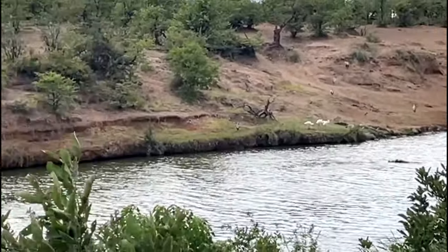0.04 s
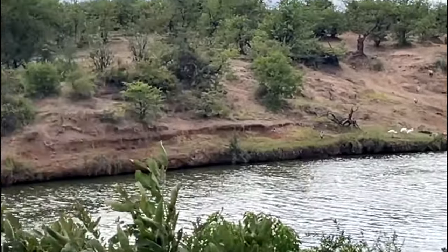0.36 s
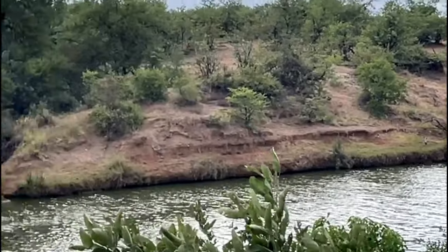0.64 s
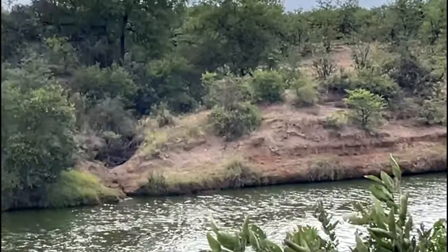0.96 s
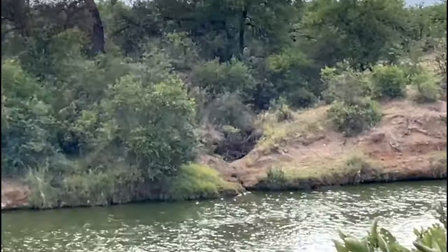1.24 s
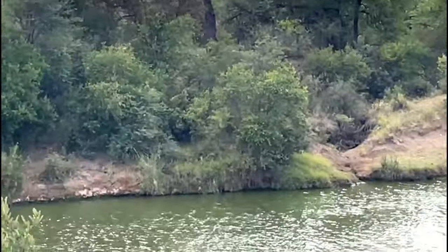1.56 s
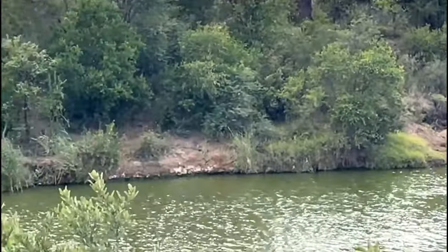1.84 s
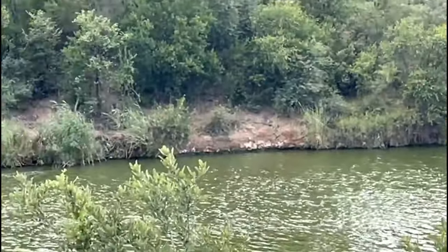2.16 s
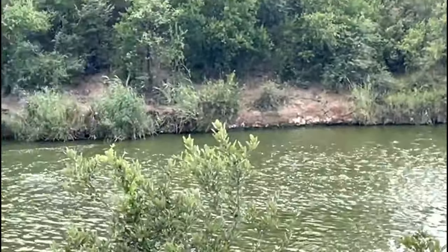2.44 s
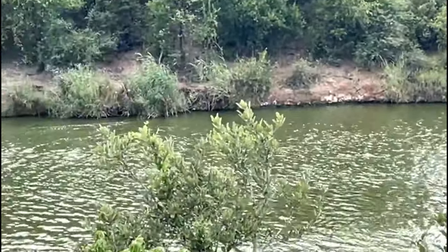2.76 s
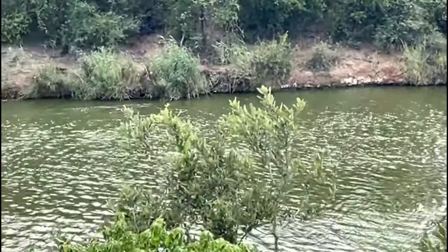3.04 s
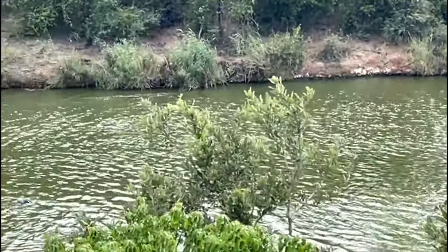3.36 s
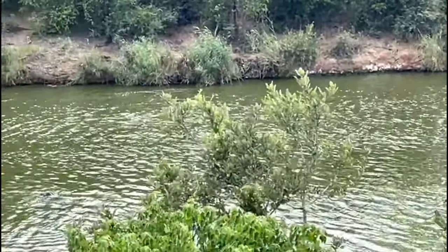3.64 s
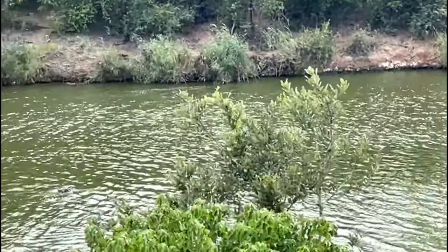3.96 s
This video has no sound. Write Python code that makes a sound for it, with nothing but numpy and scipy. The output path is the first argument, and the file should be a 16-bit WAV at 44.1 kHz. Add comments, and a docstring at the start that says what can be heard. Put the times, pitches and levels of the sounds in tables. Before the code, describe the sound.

Deep, gusty wind buffets a microphone outdoors by a river, swelling in the middle and thinning to single blows. A handling bump and small clicks come near the start, while faint birds whistle over the soft hiss of water.

```python
"""Wind blows across a hand-held microphone on a bank above a river.
From the start, large eddies make a deep rumble over the soft hiss of water. The first second brings
thin falling bird whistles, small dry clicks, a thud of the housing and a faint sniff-like hiss.
A near bird gives a buzzy double chirp. As the gust builds, eddies burst on the port, faster and sharper,
and leaves rustle at its height. More far whistles follow, and the wind thins out to single buffets."""
import sys
import numpy as np
from scipy import signal
from scipy.fft import rfft, irfft
from scipy.io import wavfile
from scipy.ndimage import uniform_filter1d, minimum_filter1d

SR = 44100
rng = np.random.default_rng(int(sys.argv[2]) if len(sys.argv) > 2 else 0)


def digitize_waveform(pressure):
    """Quantize a signal to 16-bit integers and store it at the path in sys.argv[1].

    Rows of a 2-D input are taken as channels; values are limited to [-1, 1].
    """
    field = np.atleast_2d(pressure).T
    bounded = np.clip(field, -1, 1)
    quanta = np.round(bounded * 32767).astype(np.int16)
    wavfile.write(sys.argv[1], SR, quanta)


N = 4 * SR

# slow pressure swell on the microphone: time_s, level_db
RUMBLE_LEVELS = [(0, -31), (.06, -27.5), (.2, -30.5), (.3, -26.5), (.37, -32), (.6, -25), (.75, -24),
                 (1.05, -22.5), (1.2, -20.5), (1.62, -21), (1.75, -16), (2.08, -19.5), (2.35, -15.5),
                 (2.8, -19), (2.93, -20), (3.05, -20), (3.35, -20), (3.47, -23), (3.6, -20), (3.71, -23.5),
                 (3.79, -19), (4, -23)]
# spectrum of the swell: frequency_hz, density_db
RUMBLE_SPECTRUM = [(20, -52), (31, -47), (42, -23), (58, -5), (95, -3), (160, -8), (250, -15.5), (400, -29),
                   (800, -52), (1600, -88)]
def rumble(evenness=.5, smoothing_s=0.019):
    """Turbulent pressure fluctuation: large, slow eddies merge into a fairly even roll."""
    pressure = noise(RUMBLE_SPECTRUM)
    power = uniform_filter1d(pressure ** 2, int(smoothing_s * SR))
    power = uniform_filter1d(power, int(smoothing_s * SR / 2))
    return envelope(RUMBLE_LEVELS) * rms_one(pressure / (power + 1e-6) ** (evenness / 2))


def eddy(t, hz, phase_turns, ringing=2.13):
    """Convection: a passing vortex pushes and pulls on the port; unit energy, centred on t = 0."""
    swing = np.exp(2j * np.pi * phase_turns) / (1 - 2j * np.pi * hz * t / ringing) ** (ringing + 1)
    pulse = swing.real * soft_window(t)
    return pulse / np.sqrt(np.sum(pulse ** 2))


# strength of the gust, as the level of its eddies: time_s, level_db
GUST_LEVELS = [(0, -41.5), (.24, -34.5), (.31, -27.5), (.37, -42), (.61, -29), (.73, -20.5), (.91, -20),
               (1.02, -26.5), (1.16, -19.5), (1.48, -19.5), (1.67, -23), (1.87, -18.5), (2.04, -24),
               (2.29, -19), (2.55, -19), (2.8, -23.5), (2.94, -29), (3.14, -26.5), (3.25, -26), (3.47, -33),
               (3.57, -31.5), (3.81, -35), (4, -26)]
def churn(eddies_per_s=520, spread_db=2.5, flutter_db=2.5, reference_hz=200.3, reference_db=-21):
    """Turbulence in a gust: stronger eddies pass faster, so louder pulses are also higher in pitch."""
    octaves_per_db, spread_octaves = 0.0853, 0.21
    count = 3000
    jitter, phases = rng.random((count, 2)).T
    size, pitch = rng.standard_normal((2, count))
    times = (np.arange(count) + jitter) / eddies_per_s
    gust, flutter = curve(GUST_LEVELS, times), drift(rate_hz=37.5)
    excess_db = np.log(10) / 20 * (spread_db ** 2 + flutter_db ** 2)   # power added by random levels
    stream_gain = np.sqrt(SR / eddies_per_s) / from_db(excess_db)
    out, t = np.zeros(N), np.arange(-400, 400) / SR
    for k in np.flatnonzero(times < (N - 1) / SR):
        db = gust[k] + flutter_db * min(flutter[int(times[k] * SR)], 1.5)
        db += spread_db * np.clip(size[k], -2, 2)
        octaves = octaves_per_db * (db - reference_db) + spread_octaves * np.clip(pitch[k], -2, 1.5)
        pulse = eddy(t, reference_hz * 2 ** octaves, phases[k]) * soft_window(t)
        add(out, times[k] + t[0], stream_gain * from_db(db) * pulse)
    return butter(out, 1170, "low", order=6)


# knots of eddies that hit the port: centre_s, level_db, length_s, pitch_hz
BUFFET_KNOTS = [(0.282, -16, 0.012, 135), (0.345, -24.5, 0.013, 197), (0.418, -19, 0.012, 100),
                (0.545, -22, 0.0122, 201), (0.71, -17.5, 0.019, 204), (0.862, -27, .012, 240),
                (0.88, -21.5, 0.0096, 280), (0.959, -14, 0.0083, 280), (1.153, -17.5, 0.0098, 280),
                (1.171, -15.5, 0.015, 251), (1.203, -19.5, 0.016, 240), (1.246, -21, 0.016, 279),
                (1.302, -23, 0.026, 234), (1.345, -16, .012, 167), (1.359, -19, 0.011, 290),
                (1.463, -15, .014, 277), (1.534, -9, 0.014, 209), (1.579, -15.5, 0.0089, 260),
                (1.717, -13.5, .018, 200), (1.768, -17, 0.016, 270), (1.791, -17, 0.0089, 400),
                (1.805, -15.5, 0.011, 310), (1.879, -16, 0.011, 330), (1.905, -13, 0.02, 231),
                (1.936, -15.5, 0.016, 190), (2.176, -7, 0.012, 280), (2.259, -19, 0.011, 280),
                (2.286, -12.5, 0.012, 280), (2.309, -10.5, 0.021, 244), (2.35, -14, .01, 220),
                (2.379, -22, 0.014, 280), (2.451, -13, 0.015, 250), (2.588, -12.5, 0.0094, 230),
                (2.605, -19.5, 0.011, 344), (2.511, -13, 0.00783, 217), (2.68, -14, 0.013, 234),
                (2.767, -14.5, 0.018, 235), (2.864, -17, 0.013, 257), (2.881, -25, 0.01265, 272),
                (3.036, -16, 0.015, 128), (3.092, -17, 0.013, 219), (3.117, -16, 0.01185, 272),
                (3.172, -13.5, 0.014, 178), (3.331, -15.5, 0.014, 219), (3.381, -17, 0.013, 195),
                (3.434, -12.5, 0.021, 136), (3.512, -12.5, 0.017, 249), (3.532, -15.5, 0.016, 215),
                (3.582, -20, 0.0099, 204), (3.65, -13.5, 0.016, 171), (3.723, -21.5, 0.0087, 186),
                (3.741, -19.5, 0.013, 197), (3.789, -12.5, 0.017, 109), (3.83, -15.5, 0.017, 121),
                (3.877, -16, 0.014, 240), (3.894, -25, 0.013, 267), (3.943, -18, .015, 135)]
def buffets(count=5, spread_share=0.397, spread_octaves=0.14, trim_db=-0.12):
    """Superposition: one strong eddy and weaker ones crowded around it sum to a single blow."""
    out, t = np.zeros(N), np.arange(-2000, 2000) / SR
    places = np.linspace(-1, 1, count)
    weights = from_db(-6 * np.abs(places))
    for centre_s, db, length_s, hz in BUFFET_KNOTS:
        phases, jitter, detune = rng.uniform(-1.068, 1, (3, count))
        delays_s = length_s * spread_share * (places + jitter / count)
        pitches_hz = hz * 2 ** (spread_octaves * detune)
        knot = sum(weights[k] * eddy(t - delays_s[k], pitches_hz[k], phases[k]) for k in range(count))
        knot *= np.sqrt(length_s * SR / np.sum(knot ** 2))
        add(out, centre_s + t[0], from_db(db + trim_db) * knot)
    return butter(out, 1330, "low", order=6)


# the sharpest eddies on the port: centre_s, relative_peak_db
SNAP_PEAKS = [(0.961, -23.5), (1.169, -10), (1.206, -22.5), (1.459, -18), (1.484, -18.5), (1.536, -20),
              (1.645, -20.5), (1.708, -18.5), (1.719, -20), (1.761, -12.5), (1.791, -8.5), (1.808, -15),
              (1.878, -16.5), (2.259, -16), (2.285, -15.5), (2.309, -11), (2.318, -15), (2.364, -19.5),
              (2.379, -13.5), (2.452, -11), (2.606, -11.5), (3.118, -23), (3.508, -23), (3.52, -17),
              (3.646, -29)]
def snaps(pitch_hz=446, trim_db=-1.5):
    """A shorter pulse has a wider spectrum: lone, very fast eddies give the gust its crackle."""
    out, t = np.zeros(N), np.arange(-400, 400) / SR
    for centre_s, db in SNAP_PEAKS:
        pulse = eddy(t, pitch_hz, rng.random())
        add(out, centre_s + t[0], from_db(db + trim_db) * pulse / np.abs(pulse).max())
    return butter(out, 1850, "low", order=6)


# small dry clicks close to the microphone: start_s, level_db, low_hz, high_hz, t60_s
SOFT_CLICKS = [(0.298, -40, 500, 3000, 0.031), (0.313, -33, 348, 2920, 0.037),
               (0.313, -40.5, 3300, 15000, 0.016), (.43, -60, 11000, 15500, .03),
               (.577, -29, 550, 2140, 0.015), (0.759, -41.5, 1500, 2980, 0.017),
               (0.76, -40.5, 8000, 12500, 0.011)]
def clicks_and_thud(attack_s=0.0022, thud_s=.313, thud_db=-13, thud_hz=83, thud_t60_s=0.14):
    """Exponential decay: short bursts of noise make dry clicks; a damped mode of the housing thuds."""
    out, t = np.zeros(N), np.arange(SR // 5) / SR
    for start_s, db, low_hz, high_hz, t60_s in SOFT_CLICKS:
        burst = rng.standard_normal(len(t)) * from_db(db - 60 * t / t60_s) * np.minimum(t / attack_s, 1)
        band_gain = np.sqrt(SR / 2 / (high_hz - low_hz))
        add(out, start_s, band_gain * butter(burst, [low_hz, high_hz], "band", order=4))
    thud = from_db(thud_db - 60 * t / thud_t60_s) * np.sin(2 * np.pi * thud_hz * t)
    add(out, thud_s, butter(thud, 410, "low"))
    return out


# airy, sniff-like hiss: frequency_hz, density_db
SNIFF_SPECTRUM = [(1000, -12), (2200, -5), (3500, -6), (4200, -7), (4600, 2), (5200, -7), (7800, -10),
                  (12000, -14), (14600, -14), (15500, -36)]
def faint_sniff(start_s=.56, length_s=0.23, level_db=-60):
    """Amplitude-shaped noise: a short, faint, sniff-like hiss that swells and fades."""
    out, count = np.zeros(N), int(length_s * SR)
    swell = np.sin(np.linspace(0, np.pi, count))
    add(out, start_s, from_db(level_db) * swell * noise(SNIFF_SPECTRUM)[:count])
    return out


# buzzy notes that rise to their pitch: start_s, length_s, level_db, rise_hz
CHIRP_NOTES = [(0.971, 0.041, -49.5, 1160), (1.056, 0.041, -50.5, 796)]
def chirps(pitch_hz=6650, trill_per_s=112, sweep_hz=1780, rise_s=0.012):
    """Frequency and amplitude modulation: a near bird's fast run of downward sweeps makes a buzz."""
    out, waver_hz = np.zeros(N), 170 * drift(rate_hz=63)
    for start_s, length_s, db, rise_hz in CHIRP_NOTES:
        t = np.arange(int(length_s * SR)) / SR
        cycle = t * trill_per_s % 1
        hz = pitch_hz + sweep_hz * (.5 - cycle) - rise_hz * np.clip(2 * (1 - t / rise_s), 0, 1)
        hz += waver_hz[int(start_s * SR):][:len(t)]
        pulsing = np.sqrt(np.sin(np.pi * cycle))
        add(out, start_s, from_db(db) * tone(hz, taper=0.19) * pulsing)
    out += from_db(-3) * scatter(out, build_s=0.0015, t60_s=0.043)   # the bush around the bird
    return out + from_db(-7) * scatter(out, build_s=0.055)


# calls of distant birds: start_s, length_s, start_hz, end_hz, level_db
WHISTLE_GLIDES = [(0.038, 0.069, 5650, 4430, -72), (0.242, .15, 6030, 4370, -60.5),
                  (0.779, 0.034, 5840, 4680, -71), (1.81, 0.069, 6050, 5300, -69),
                  (2.17, 0.17, 7500, 4100, -79), (2.594, 0.1, 5700, 4650, -62.5),
                  (2.65, .085, 4120, 3480, -63), (2.627, 0.083, 7170, 7630, -70.5),
                  (2.73, 0.065, 5630, 4900, -70)]
def whistles():
    """Random frequency modulation roughens the thin glides of far birds; their echo blurs them."""
    out, waver_hz = np.zeros(N), 200 * drift(rate_hz=190)
    for start_s, length_s, start_hz, end_hz, db in WHISTLE_GLIDES:
        hoarse_hz = waver_hz[int(start_s * SR):int((start_s + length_s) * SR)]
        glide_hz = np.linspace(start_hz, end_hz, len(hoarse_hz))
        add(out, start_s, from_db(db) * tone(glide_hz + hoarse_hz, taper=0.31))
    return out + from_db(-4) * scatter(out, build_s=.005)


def scatter(x, build_s, t60_s=0.51):
    """Diffuse scattering: echoes from foliage and the far bank swell, then decay exponentially."""
    t = np.arange(SR) / SR
    tail = rng.standard_normal(SR) * from_db(-60 * t / t60_s) * (1 - np.exp(-t / build_s))
    return signal.fftconvolve(x, tail / np.sqrt(np.sum(tail ** 2)))[:N]


# rush of leaves: time_s, level_db
LEAF_LEVELS = [(1.38, -71.5), (1.52, -55), (1.75, -56), (1.89, -57.5), (2.06, -54.5), (2.25, -61),
               (2.5, -75)]
# spectrum of the rush: frequency_hz, density_db
LEAF_SPECTRUM = [(500, -9), (1500, 1.5), (2200, -2.5), (3400, -8.5), (5200, -15), (6500, -28.5),
                 (12000, -45)]
def leaves():
    """Incoherent addition: many leaves blend into a smooth hiss while the wind is strongest."""
    return envelope(LEAF_LEVELS) * noise(LEAF_SPECTRUM)


# background of water and leaves: time_s, level_db
RIVER_LEVELS = [(0, -57), (.5, -56.5), (1.3, -56.5), (2.4, -56), (2.9, -56.5), (4, -53.5)]
# spectrum of the background: frequency_hz, density_db
RIVER_SPECTRUM = [(200, 10), (550, 8.5), (950, 6.5), (1400, -1), (2200, -4), (4000, -4.5), (6500, -9),
                  (8500, -12.5), (12000, -17), (13000, -26), (15600, -33)]
def river():
    """Broadband flow noise: water and leaves make a soft, nearly steady hiss."""
    return envelope(RIVER_LEVELS) * noise(RIVER_SPECTRUM)


def from_db(db):
    """Decibels to amplitude ratio."""
    return 10 ** (np.asarray(db) / 20)


def rms_one(x):
    """Normalisation to unit rms."""
    return x / np.sqrt(np.mean(x ** 2) + 1e-20)


def curve(rows, t):
    """Linear interpolation of (time_s, value) rows."""
    return np.interp(t, *np.transpose(rows))


def envelope(levels):
    """Amplitude envelope from (time_s, level_db) rows."""
    return from_db(curve(levels, np.arange(N) / SR))


def soft_window(t):
    """Taper from 1 at t = 0 to zero at both ends."""
    return (1 - (t / t[0]) ** 2) ** 2


def add(out, start_s, sound):
    """Superposition of a sound on the mix."""
    i = max(int(start_s * SR), 0)
    out[i:i + len(sound)] += sound[:max(N - i, 0)]


def butter(x, hz, kind, order=2):
    """Butterworth filter."""
    return signal.sosfilt(signal.butter(order, hz, kind, fs=SR, output="sos"), x)


def noise(spectrum):
    """Spectral shaping of white noise by (frequency_hz, density_db) rows; rms 1."""
    hz, db = np.transpose(spectrum)
    bins_hz = np.maximum(np.arange(N // 2 + 1) * SR / N, 1)
    gain = from_db(np.interp(np.log(bins_hz), np.log(hz), db))
    return rms_one(irfft(rfft(rng.standard_normal(N)) * gain, N))


def drift(rate_hz):
    """Band-pass noise: a random swing around rate_hz, with no slow trend; rms 1."""
    ratio = np.arange(N // 2 + 1) * SR / N / rate_hz
    return rms_one(irfft(rfft(rng.standard_normal(N)) * ratio ** 2 / (1 + ratio ** 2) ** 2, N))


def tone(hz, taper):
    """Phase is the integral of frequency: a sine on a pitch track, faded in and out; rms about 1."""
    phase = 2 * np.pi * np.cumsum(hz) / SR
    return np.sqrt(2) * np.sin(phase) * signal.windows.tukey(len(hz), taper)


def scene(port_low_hz=70):
    """Linear superposition: wind at the microphone port adds to the quiet riverside, in mono."""
    eddies = butter(churn() + buffets() + snaps(), port_low_hz, "high", order=4)
    mix = eddies + river() + rumble() + leaves() + chirps() + whistles()
    return (mix + clicks_and_thud() + faint_sniff())[None]


def record(dry, ceiling=0.82, low_hz=30.2, high_hz=15700):
    """Band and peak limiting: the deepest bass is shed, the ends fade, peaks are eased, the top is cut."""
    hold = SR // 100   # 10 ms
    faded = butter(dry, low_hz, "high", order=4) * signal.windows.tukey(N, hold / N)
    gain = minimum_filter1d(np.minimum(1, ceiling / (np.abs(faded) + 1e-9)), 2 * hold)
    gain = uniform_filter1d(uniform_filter1d(gain, hold), hold)
    return signal.sosfilt(signal.ellip(10, .1, 80, high_hz, fs=SR, output="sos"), faded * gain)


dry = scene()
out = record(dry)
digitize_waveform(out)
```